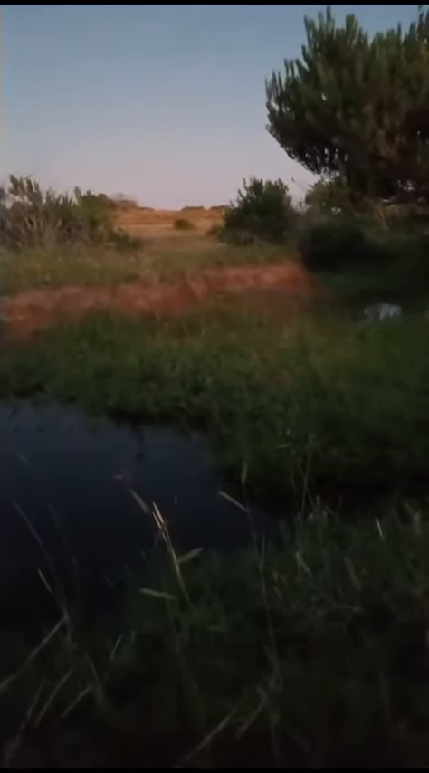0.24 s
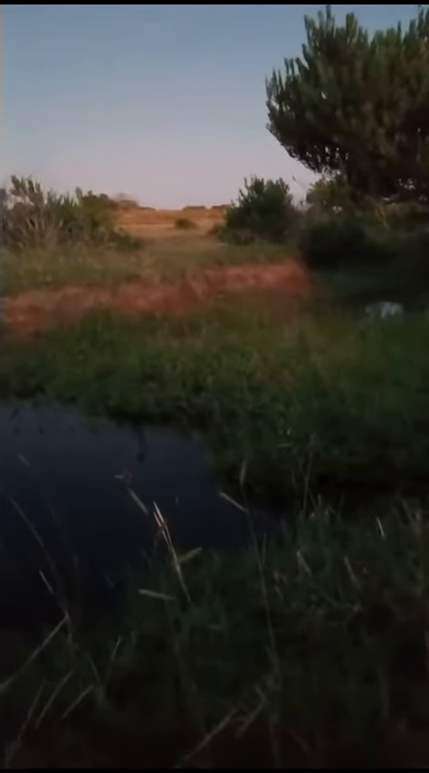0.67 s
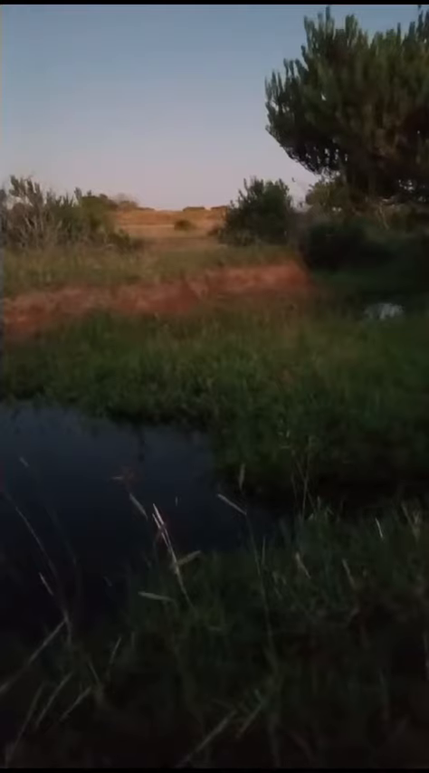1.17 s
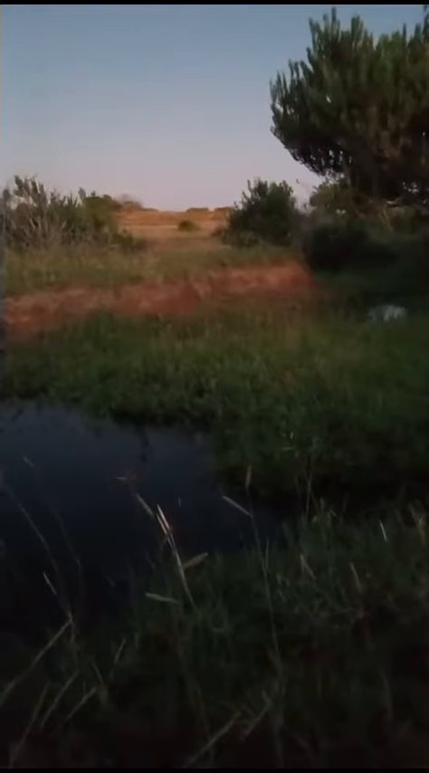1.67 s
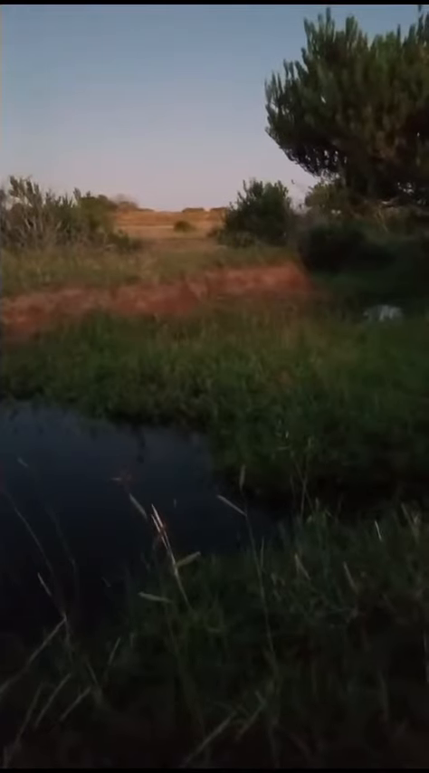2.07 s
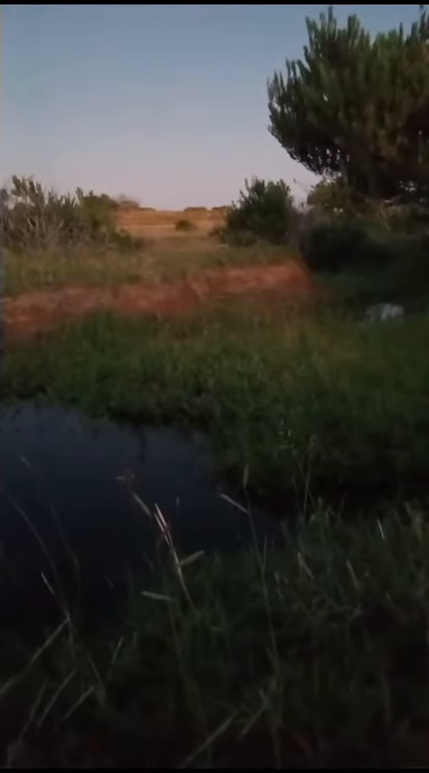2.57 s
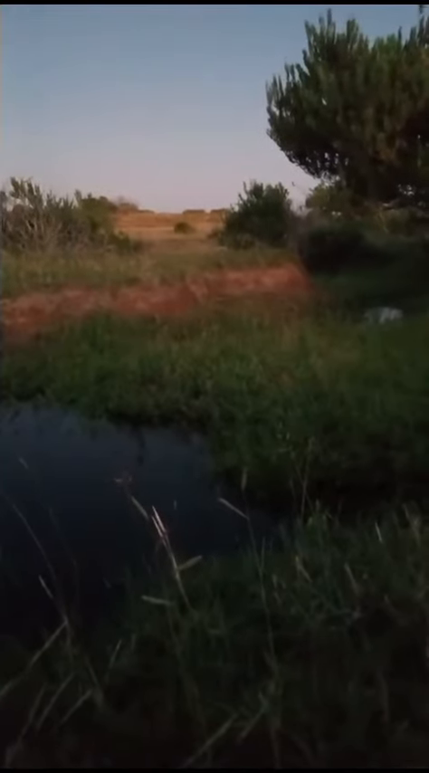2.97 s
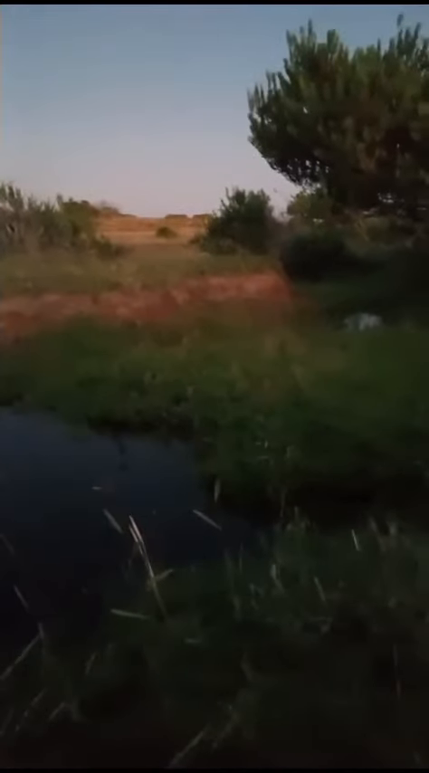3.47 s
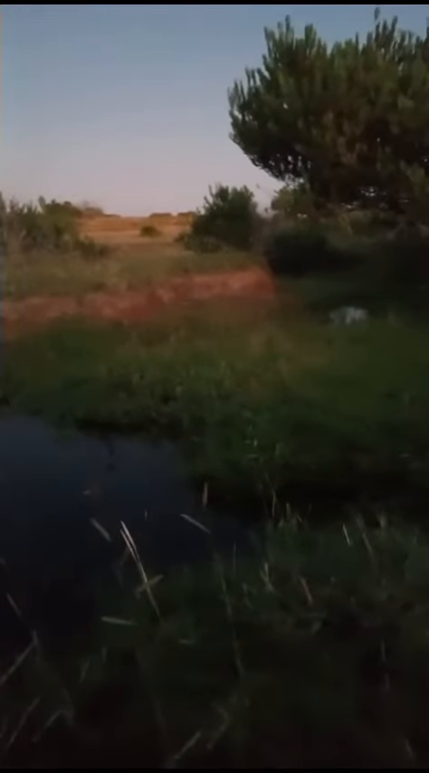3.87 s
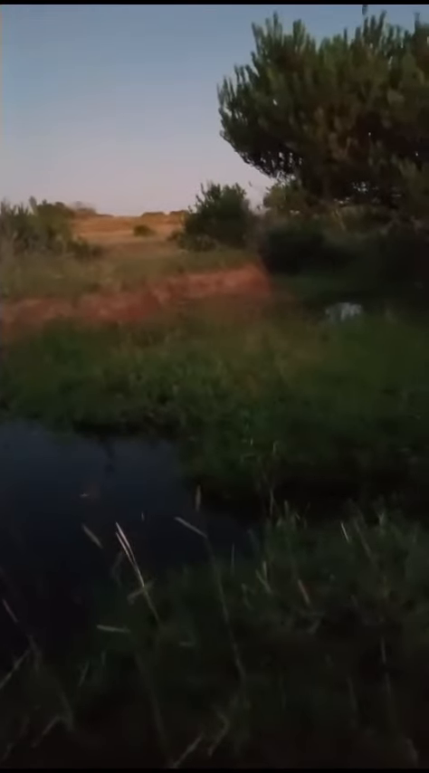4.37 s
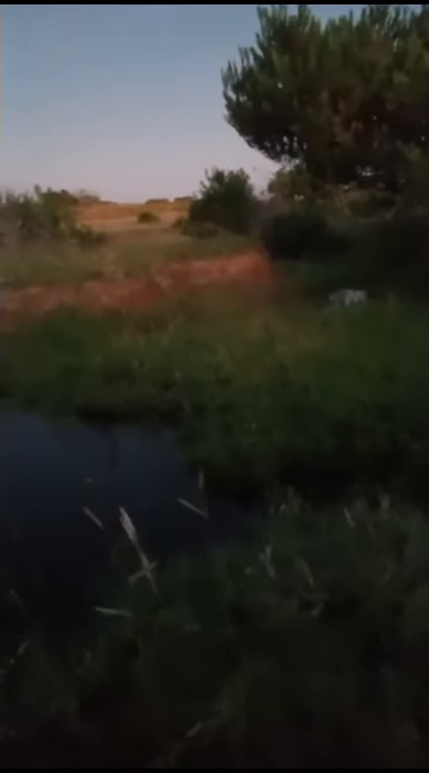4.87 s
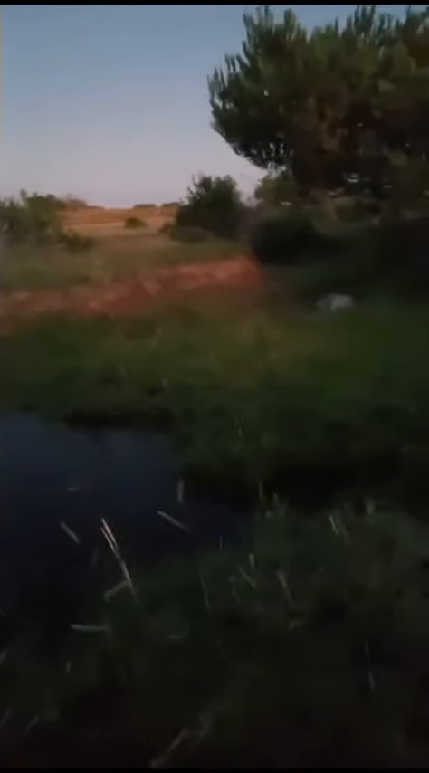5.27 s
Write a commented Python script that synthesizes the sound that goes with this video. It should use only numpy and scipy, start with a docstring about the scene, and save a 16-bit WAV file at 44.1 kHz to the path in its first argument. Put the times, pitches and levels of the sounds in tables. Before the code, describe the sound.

Crickets trill and tick in quick pairs over a shimmering insect chorus while frogs give short rising whips and squeaky two-part calls by a pond.

```python
"""Dusk at a grassy pond, over a far insect chorus, air noise and a low breeze.
At first one cricket trills (wing strokes ring a resonance), another ticks (scrapes ring wing modes), and
frogs give rising whips (swept sines) and falling whines (partials through a resonance). From 1.1 s come
squeaky two-part calls (pulsed rasp, then held note) and low croaks (pulsed noise through a resonance);
a thin far tone wavers from 1.6 to 2.9 s. From 3.3 s a second cricket trills, later joined by low ticks."""
import sys
import numpy as np
from scipy import signal
from scipy.fft import rfft, irfft
from scipy.io import wavfile
from scipy.ndimage import uniform_filter1d

SR = 44100
rng = np.random.default_rng(int(sys.argv[2]) if len(sys.argv) > 2 else 0)


def dump_mix(stems):
    """Bounce the given channels to the path in sys.argv[1] as a 16-bit WAV at rate SR."""
    frames = np.atleast_2d(stems).T  # one column per channel
    limited = np.clip(frames, -1, 1)  # hard clip at full scale
    pcm = np.round(limited * 32767).astype(np.int16)
    wavfile.write(sys.argv[1], SR, pcm)


def volts_from_decibels(level):
    """Turn decibel levels (scalar or array-like) into linear amplitude factors."""
    exponent = np.asarray(level, float) / 20
    return 10 ** exponent


N = 243873

# wing strokes of the two trilling crickets: time_s, rate_per_s
EARLY_STROKES = [(0, 188.4), (.6, 187.5), (.9, 186.3), (1.02, 185), (1.08, 183)]
LATE_STROKES = [(3.31, 202), (3.335, 212.5), (3.367, 212.5), (3.387, 220), (3.43, 217), (3.48, 216.8),
                (3.57, 219), (3.68, 217.2), (3.84, 218.2), (3.87, 214.7), (4.0, 215.5), (4.38, 215),
                (4.43, 212.4), (4.52, 213.6), (4.65, 211), (4.74, 211.7), (4.84, 208.9), (4.96, 209.9),
                (5.05, 208), (5.2, 207.3), (5.34, 208), (5.44, 204.6), (5.53, 205.1)]
# wing resonance during each trill: time_s, resonance_hz, level_db
EARLY_TRILL = [(0, 5124, -26), (0.151, 5034, -34.5), (.3, 5114, -28.5), (.5, 4890, -39.5),
               (.8, 5144, -38.5), (.94, 5040, -30.5), (1.067, 4930, -33.5), (1.07, 5050, -42)]
LATE_TRILL = [(3.305, 4075, -75), (3.313, 4150, -29.5), (3.364, 4460, -25.5), (3.42, 4780, -26),
              (3.652, 5010, -25.5), (3.851, 5080, -24.5), (4.059, 5112, -26), (4.2, 5100, -24),
              (4.7, 5132, -23.5), (4.92, 5026, -27), (5.122, 5100, -23.5), (5.251, 5170, -28),
              (5.53, 5016, -28)]
# wing modes rung by a tick: frequency_hz (before tuning), relative_level_db, t60_s
TICK_MODES = [(5090, -1, 0.032), (5360, -16, 0.043), (4250, -24.5, 0.015), (10800, -47, 0.0028),
              (15300, -49, .004)]
# rhythm of the paired ticks, even between rows: pair_number, first_tick_s, gap_to_second_s
TICK_PAIRS = [(0, .2057, .0302), (1, .3105, .0375), (7, .9684, .0398), (8, 1.079, .0414), (9, 1.191, .0347),
              (15, 1.8134, .0342), (19, 2.2354, .0343), (24, 2.7573, .0346), (26, 2.968, .036),
              (29, 3.2948, .036), (30, 3.408, .038), (31, 3.523, .05), (32, 3.656, .035), (33, 3.778, .042),
              (34, 3.902, .039), (38, 4.419, .044), (40, 4.67, .044)]
# strength of the paired ticks, before their spread: time_s, level_db
PAIR_LEVEL = [(.2, -16.5), (1.2, -17.5), (3.1, -16.5), (3.3, -20.5), (3.9, -16), (4.2, -16.5), (4.7, -35)]
# ticks outside the rhythm, and those of a lower ticker: time_s, level_db
LOOSE_TICKS = [(.0402, -18.5), (.0807, -13.5), (.1524, -17.5), (4.975, -15), (5.028, -20), (5.211, -15.5),
               (5.248, -18), (5.323, -17), (5.382, -20), (5.448, -17)]
LOW_TICKS = [(4.518, -24.5), (4.66, -27), (5.0, -32), (5.15, -21), (5.29, -20.5)]
# frog whips: time_s, level_db
WHIPS = [(0.155, -26.5), (0.4623, -26.5), (0.766, -26), (1.0659, -26), (1.267, -26), (1.568, -26.5),
         (1.8912, -26.5), (2.159, -27.5), (2.5236, -27), (3.0804, -27.5), (3.402, -29.5), (3.61, -29),
         (3.8131, -29.5), (4.0205, -30.5), (4.3702, -28), (4.7447, -30), (5.0813, -29.5), (5.3706, -29)]
# course of one whip: time_from_whip_s, pitch_hz, relative_level_db
WHIP_COURSE = [(-.018, 920, -39), (-.008, 1140, -13.5), (-.002, 1380, -18), (.003, 1760, 2.5),
               (.007, 1970, 1), (.011, 2200, -21.5), (.015, 2250, -55.5)]
# squeaks: start_s, rasp_s, hold_s, rasp_pitch_hz, held_pitch_hz (both before bending), level_db
SQUEAKS = [(1.099, 0.03, 0.073, 1176, 1288, -44.5), (1.524, 0.033, .08, 1115, 1267, -35.5),
           (1.931, 0.04, 0.077, 1079, 1275, -32), (2.35, 0.048, .068, 1096, 1272, -31),
           (2.755, 0.031, .107, 1080, 1278, -30.5), (3.172, 0.087, .037, 1144, 1242, -28),
           (3.591, 0.034, .1, 1163, 1252, -33.5), (3.988, .115, .008, 1100, 1230, -34),
           (4.37, 0.13, .01, 1076, 1187, -32.5), (4.757, .108, .02, 1124, 1203, -27.5),
           (5.15, 0.13, .008, 1079, 1200, -32.5)]
# the held note slips back into the rasp: start_s, length_s
CATCHES = [(2.8, .012), (2.85, .009)]
# upper partials of the squeaks as the frog turns away: time_s, relative_level_db
BRIGHTNESS = [(1.1, -1), (2.4, 2), (3.2, -9), (4.0, -13), (4.4, -26), (5.2, -20.5)]
# a clear note that takes over from one rasp: time_s, pitch_hz, level_db
EXTRA_NOTE = [(4.39, 1312, -65.5), (4.405, 1240, -39), (4.44, 1210, -33), (4.46, 1130, -51),
              (4.466, 1140, -74)]
# colour of the vocal sac: frequency_hz, gain_db
SAC_COLOUR = [(1000, -49), (1300, -37.5), (1900, -24.5), (2200, -17), (2500, -6), (2850, -7.5), (3300, 1),
              (3850, 0), (4400, -1.5), (5800, -10.5), (6400, 0), (7000, -20), (7700, -20.5), (8900, -35.5),
              (10200, -40), (11400, -33), (12800, -40.5), (14100, -47.5), (15500, -59)]
# whines: start_s, lowest_partial_db, upper_partials_db
WHINES = [(-.2, -74.5, -82), (0.291, -56.5, -59), (1.209, -65.5, -64), (1.719, -79, -75),
          (2.57, -75.5, -68.5), (2.768, -57, -57.5), (5.192, -66, -62.5), (5.43, -59, -48)]
# course of one whine: time_from_start_s, lowest_partial_relative_db, upper_partials_relative_db
WHINE_COURSE = [(0, -33, -43), (.04, 7.5, -38.5), (.19, 1.5, -10), (.24, -25.5, -13), (.29, -11, -7.5),
                (.37, 0.5, -3), (.58, -17, -3), (.63, -36, -4.5), (.76, -51.5, -4), (.8, -45.5, -25)]
# upper partials of a whine: multiple, relative_level_db
WHINE_UPPER = [(5, 0.5), (6, -4), (7, 2.5)]
# croaks: start_s, length_s, resonance_hz, width_hz, level_db
CROAKS = [(1.189, 0.079, 844, 299, -48.5), (1.23, 0.12, 664, 400, -54), (1.475, 0.091, 760, 404, -59.5),
          (2.091, 0.12, 603, 198, -56.5), (2.161, 0.072, 543, 295, -53), (3.205, 0.033, 510, 233, -45.5),
          (3.274, 0.099, 1120, 257, -50), (3.169, 0.32, 2030, 650, -49.5), (4.999, 0.058, 217, 35, -58)]
# echoes from water and banks: delay_s, relative_level_db
ECHOES = [(.0072, -11.5), (0.0106, -13), (0.0152, -14), (0.022, -24), (0.032, -30.5), (.043, -39)]
# far cricket, before its waver: time_s, pitch_hz, level_db
FAR_CRICKET = [(1.6, 4120, -92), (1.85, 4120, -50), (2.2, 4270, -53.5), (2.6, 4230, -51), (2.9, 4230, -62)]
# spectra of the far chorus and the air: frequency_hz, relative_level_db (per Hz)
CHORUS_SPECTRUM = [(3700, -40.5), (4050, -27), (4250, -9), (4800, 1.5), (5300, 5.5), (5900, -3),
                   (6400, -10), (6700, -32), (7500, -29), (9300, -30.5), (10000, -54.5), (15500, -76)]
AIR_SPECTRUM = [(25, -31.5), (60, -3), (200, 1.5), (300, -4.5), (400, -11.5), (900, -15.5), (1400, -18.5),
                (2000, -10), (2700, -14), (3500, -15), (4000, -24)]
# background levels: time_s, chorus_db, air_db
BACKGROUND = [(0, -39.5, -56.5), (1.002, -39, -61.5), (1.6, -41.5, -63.5), (2.3, -43, -65.5),
              (3.1, -43, -61.5), (3.4, -43, -64.5), (4.002, -48, -69.5), (4.699, -46, -66),
              (5.101, -44.5, -68), (5.53, -46, -66)]


def time_s():
    """Sampling: the time of every sample."""
    return np.arange(N) / SR


def in_time(rows, start=0):
    """Linear interpolation: where a table lasts, and its columns over that time."""
    s, *columns = np.transpose(rows)
    span = slice(*np.clip(np.round((s[[0, -1]] + start) * SR).astype(int), 0, N))
    return span, [np.interp(time_s()[span] - start, s, c) for c in columns]


def turns(hz):
    """Phase is the running integral of frequency."""
    return 2 * np.pi * np.cumsum(hz) / SR


def rms_one(x):
    """Normalisation to unit mean power."""
    return x / np.sqrt(np.mean(np.abs(x) ** 2) + 1e-20)


def drift(rate):
    """Low-passed noise: slow chance of unit spread, with a two-pole corner near rate in Hz."""
    every = 20   # computed at every 20th sample, then interpolated
    pole = np.exp(-2 * np.pi * every * rate / SR)
    noise = rng.standard_normal(N // every + 1002)
    slow = signal.lfilter([1], [1, -2 * pole, pole * pole], noise)[1000:]
    return np.interp(np.arange(N) / every, np.arange(len(slow)), rms_one(slow))


def trill(rates, song, width_hz, skirt_db, second_db, third_db, waver_db, rough, opening, sweep=-0.55):
    """Stridulation: periodic wing strokes excite a resonance, which weights multiples of the stroke rate."""
    out = np.zeros(N)
    span, (wing_hz, level_db) = in_time(song)
    t = time_s()[span]
    rate = np.interp(t, *np.transpose(rates))
    # the resonance widens, so strokes shorten as the song gets going
    width_hz = width_hz * np.clip(opening + (t - song[0][0]) / 0.13, 0, 1)
    pulses, even = 0, 0
    for k in range(12, 34):
        carrier = np.exp(1j * k * turns(rate))
        off = (k * rate - wing_hz) / width_hz
        ring = np.exp(-off ** 2 / 2 - 1j * off - 1j * sweep * off ** 2)
        ring = ring + volts_from_decibels(skirt_db - 0.81 * off ** 2) * (off < 0)   # a faint skirt below the peak
        paths = volts_from_decibels(waver_db * drift(4.9)[span])   # shifting paths
        uneven = rough * (drift(130) + 1j * drift(120))[span]   # uneven strokes
        pulses = pulses + (paths + uneven) * ring * carrier
        steady_off = (k * rate - np.median(wing_hz)) / width_hz
        even = even + np.exp(-steady_off ** 2 / 2) * carrier
    # powers of the even pulses give the second and third harmonics
    overtones = volts_from_decibels(second_db) * rms_one(even ** 2) + volts_from_decibels(third_db) * rms_one(even ** 3)
    singing = np.clip((level_db + 60) / 20, 0, 1)
    out[span] = np.sqrt(2) * (volts_from_decibels(level_db) * rms_one(pulses) + singing * overtones).real
    return out


def tick_pairs(second_louder_db=2.5, spread_db=2.2):
    """Rhythmic stridulation: times and strengths of paired ticks, first and second in turn."""
    number, first_s, gap_s = np.transpose(TICK_PAIRS)
    pair = np.arange(number[-1] + 1)
    first = np.interp(pair, number, first_s)
    s = np.transpose([first, first + np.interp(pair, number, gap_s)])
    level_db = np.interp(s, *np.transpose(PAIR_LEVEL)) + [0, second_louder_db]
    level_db = level_db + spread_db * rng.standard_normal(s.shape)
    return np.transpose([s.ravel(), level_db.ravel()])


def ticks(events, first_up, second_up, rise_hz=330):
    """Impulsive excitation: scrapes ring decaying wing modes, alternate ticks tuned by their own factor."""
    s, tick_db = np.transpose(events)
    out, chance_db = np.zeros(N), rng.normal(0, 0.5, (len(s), len(TICK_MODES)))
    soft_onset = signal.bessel(4, rise_hz, fs=SR, output="sos", norm="mag")
    at = np.round((s - .0012) * SR).astype(int)   # early, since the onset filter delays
    for k, (hz, mode_db, t60) in enumerate(TICK_MODES):
        strength = volts_from_decibels(tick_db + mode_db + chance_db[:, k])
        decay = volts_from_decibels(-60 / (t60 * SR))
        for half, tuning in enumerate((first_up, second_up)):
            strikes = np.zeros(N)
            strikes[at[half::2]] = strength[half::2]
            envelope = signal.lfilter([1], [1, -decay], strikes + 1e-18)
            envelope = signal.sosfilt(soft_onset, envelope)
            out += envelope * np.sin(2 * np.pi * hz * tuning * time_s())
    return out


def whips():
    """Frequency modulation: a near sine sweeps up by more than an octave in 33 ms."""
    out = np.zeros(N)
    for s, whip_db in WHIPS:
        span, (hz, course_db) = in_time(WHIP_COURSE, start=s)
        out[span] += volts_from_decibels(whip_db + course_db) * np.sin(turns(hz))
    return out


def stack(hz, bright_db, flutter_db=1.7):
    """Harmonic series: twelve fluttering partials; those above the third follow the brightness."""
    at = rng.integers(0, N - len(hz), 13)
    flutter = volts_from_decibels(flutter_db * drift(31))
    partials = 0
    for k in range(1, 13):
        level = volts_from_decibels(bright_db * (k > 3)) * flutter[at[k]:][:len(hz)]
        partials = partials + level * np.sin(k * turns(hz))
    return partials


def rasp_pulses(per_s=120, throb_depth=.6):
    """Pulsed excitation: an unsteady cycle, its throb in level, and knocks on an upper sac resonance."""
    cycle = turns(per_s * (1 + 0.22 * drift(54)))
    throb = (1 - throb_depth * np.cos(cycle)) * volts_from_decibels(1.0 * drift(73))
    knocks = rms_one(np.diff(np.floor(cycle / (2 * np.pi)), prepend=0.))
    upper_sac = signal.butter(4, [3520, 3850], "band", fs=SR, output="sos")
    return cycle, throb, signal.sosfilt(upper_sac, knocks)


def squeaks(climb=0.075, arch=0.016, swing=.028, sag=.02, drop=0.26):
    """Source and filter: a pulsed rasp, then a held note that bends down, coloured by the vocal sac."""
    rasp_below_db, pause_s, fall_s, long_rasp_s = 3.5, 0.032, .062, .101
    snap_db, snaps_after_s = -2.5, 0.016
    under_hz, under_climb, under_climb_s, under_slide, under_db = 2520, .17, 0.029, 0.1, 0.5
    out, t = np.zeros(N), time_s()
    cycle, throb, snaps = rasp_pulses()
    slide = uniform_filter1d(cycle / np.pi % 2 - 1, size=60)   # upward within each pulse
    caught = np.any([(t > s) & (t < s + length) for s, length in CATCHES], axis=0)
    note_sounds = (t > EXTRA_NOTE[1][0] + .022) & (t < EXTRA_NOTE[-1][0])
    for start, rasp_s, hold_s, rasp_hz, held_hz, clear_db in SQUEAKS:
        clear, fall, end = start + np.cumsum([rasp_s, hold_s, fall_s])
        bright_db = np.interp(start, *np.transpose(BRIGHTNESS))
        # a longer rasp breaks off before the clear note
        pausing = (rasp_s > long_rasp_s) & (t > clear - pause_s) & (t < clear)
        silent = pausing | note_sounds
        span = slice(round(start * SR), round(end * SR))
        age, since_clear = t[span] - start, t[span] - clear
        rasping = (since_clear < 0) | caught[span]
        falling = np.clip((t[span] - fall) / (end - fall), 0, 1)

        bend = climb * np.exp(-age / .02) + arch * ((age - .055) / 0.062) ** 2
        rasp = rasp_hz * (1 - bend - swing * np.sin(cycle[span]))
        held = held_hz * (1 - sag * (since_clear / .1) ** 2 - drop * falling ** 1.5)
        pitch = uniform_filter1d(np.where(rasping, rasp, held), size=90)

        rasp_level = volts_from_decibels(clear_db - rasp_below_db) * throb[span]
        held_level = volts_from_decibels(clear_db + 2.0 * drift(130)[span] - 20.8 * falling ** 3.8)
        level = np.where(rasping, rasp_level, held_level)
        level *= np.clip(age / 0.032, 0, 1) * np.clip((end - t[span]) / 0.0013, 0, 1)
        level = uniform_filter1d(level * ~silent[span], size=130)

        out[span] += level * stack(pitch, bright_db - 25 * falling)
        snap_rise = np.clip(age / snaps_after_s - .5, 0, 1)
        out[span] += volts_from_decibels(snap_db) * level * rasping * snap_rise * snaps[span]
        # a second voice joins the rasp
        under = under_hz * (1 - under_climb * np.exp(-age / under_climb_s) + under_slide * slide[span])
        under_level = volts_from_decibels(under_db) * level * uniform_filter1d(rasping * 1., size=90)
        out[span] += under_level * np.sin(turns(under))
    span, (hz, level_db) = in_time(EXTRA_NOTE)
    out[span] += volts_from_decibels(level_db) * stack(hz, bright_db=-10.0)
    hz, gain_db = np.transpose(SAC_COLOUR)
    return irfft(rfft(out) * volts_from_decibels(np.interp(np.fft.rfftfreq(N, 1 / SR), hz, gain_db)), N)


def whines(sac_hz=2250, sac_width_hz=420):
    """Formant filtering: as the pitch falls, the sac resonance brings out upper partials that cross it."""
    start_hz, rest_hz, settle_s, sag_hz_per_s = 718, 455, .125, 100
    out, flutter = np.zeros(N), {k: volts_from_decibels(5.6 * drift(26)) for k, db in WHINE_UPPER}
    for s, low_db, high_db in WHINES:
        span, (first_db, upper_db) = in_time(WHINE_COURSE, start=s)
        age = time_s()[span] - s
        settling = np.exp(-np.abs(age / settle_s) ** (3 / 2))
        hz = rest_hz + (start_hz - rest_hz) * settling - sag_hz_per_s * age
        for k, db in WHINE_UPPER:
            multiple = round(k)
            near_sac = np.exp(-((multiple * hz - sac_hz) / sac_width_hz) ** 2 / 2)
            level = volts_from_decibels(high_db + upper_db + db) * near_sac * flutter[k][span]
            out[span] += level * np.sin(multiple * turns(hz))
        out[span] += volts_from_decibels(low_db + first_db) * np.sin(turns(hz))
    return np.sqrt(2) * out


def croaks(per_s=110):
    """Noise excitation of a resonator: uneven noisy pulses pass one resonance."""
    out = np.zeros(N)
    pulse = 2.1 + np.sin(turns(per_s * (1 + 0.203 * drift(18.5))))
    rough = rng.standard_normal(N) * pulse
    for s, length, hz, width_hz, level_db in CROAKS:
        span = slice(round(s * SR), round((s + length) * SR))
        band = signal.butter(2, [hz - width_hz / 2, hz + width_hz / 2], "band", fs=SR, output="sos")
        voice = rms_one(signal.sosfilt(band, rough[span]))
        out[span] += volts_from_decibels(level_db) * voice * signal.windows.tukey(len(voice), .6)
    return out


def pond(x, more_db, tail_db):
    """Reflection and scattering: a few echoes, then a decaying tail from the grass."""
    echo = np.zeros(round(.16 * SR))
    echo[0] = 1   # direct sound
    for lag, level_db in ECHOES:
        echo[round(lag * SR)] = volts_from_decibels(level_db + more_db)
    t = np.arange(len(echo)) / SR
    echo += volts_from_decibels(tail_db - 60 * t / 0.22) * rng.standard_normal(len(echo)) * (t > .004)   # t60 0.22 s
    return signal.fftconvolve(x, echo)[:N]


def far_cricket():
    """Random modulation: a thin tone wavers in level and pitch."""
    out = np.zeros(N)
    span, (hz, level_db) = in_time(FAR_CRICKET)
    level = volts_from_decibels(level_db + 2.5 * drift(32)[span])
    out[span] = np.sqrt(2) * level * np.sin(turns(hz + 13.0 * drift(4.6)[span]))
    return out


def coloured(spectrum, patchy_db, speed):
    """Spectral shaping: filtered noise whose third-octave bands flicker in four interleaved groups."""
    hz, level_db = np.transpose(spectrum)
    bins = np.maximum(np.fft.rfftfreq(N, 1 / SR), 1)
    gain_db = np.interp(np.log(bins), np.log(hz), level_db, -120, -120)
    shaped = rfft(rng.standard_normal(N)) * volts_from_decibels(gain_db)
    group = np.floor(3 * np.log2(bins)) % 4
    return rms_one(sum(irfft(shaped * (group == k), N) * volts_from_decibels(patchy_db * drift(speed)) for k in range(4)))


def insect_chorus():
    """Band noise: a far insect chorus is heard as flickering filtered noise."""
    s, chorus_db, _ = np.transpose(BACKGROUND)
    return volts_from_decibels(np.interp(time_s(), s, chorus_db)) * coloured(CHORUS_SPECTRUM, patchy_db=3.0, speed=110)


def air():
    """Broadband noise: the air's level and bands drift slowly."""
    s, _, air_db = np.transpose(BACKGROUND)
    level = volts_from_decibels(np.interp(time_s(), s, air_db) + 2.8 * drift(0.57))
    return level * coloured(AIR_SPECTRUM, patchy_db=3.0, speed=3.8)


def wind(level_db=-76.5, gust_db=6):
    """Turbulence: lumpy low noise from the breeze."""
    band = signal.butter(2, [52, 112], "band", fs=SR, output="sos")
    low = signal.sosfilt(band, rng.standard_normal(N))
    return volts_from_decibels(level_db + gust_db * (drift(1.5) + drift(17))) * rms_one(low)


def scene():
    """Superposition: near and far callers add over the chorus."""
    early = trill(EARLY_STROKES, EARLY_TRILL, width_hz=182, skirt_db=-24.5, second_db=-72.5,
                  third_db=-71.5, waver_db=2.6, rough=.1, opening=0.7)
    late = trill(LATE_STROKES, LATE_TRILL, width_hz=221.4, skirt_db=-16.5, second_db=-92.5,
                 third_db=-97.5, waver_db=1.6, rough=.09, opening=0.6)
    tickers = ticks(tick_pairs(), first_up=0.99, second_up=1.015)
    tickers += ticks(LOOSE_TICKS, first_up=0.96, second_up=1.004)
    tickers += ticks(LOW_TICKS, first_up=.92, second_up=.915)
    near = pond(tickers, more_db=-4.0, tail_db=-46.0)
    near += pond(whips(), more_db=3.0, tail_db=-53.5)
    near += pond(squeaks(), more_db=-16.5, tail_db=-40.5)
    frogs = whines() + croaks()
    background = far_cricket() + insect_chorus() + air() + wind()
    return (early + late + near + frogs + background)[None]


def roll_off(x):
    """The treble ends steeply here."""
    return signal.sosfilt(signal.butter(12, 15760, fs=SR, output="sos"), x)


def record(dry):
    """Signal chain: the summed scene goes through one last stage, with no other step."""
    return roll_off(dry)


dry = scene()
out = record(dry)
dump_mix(out)
```